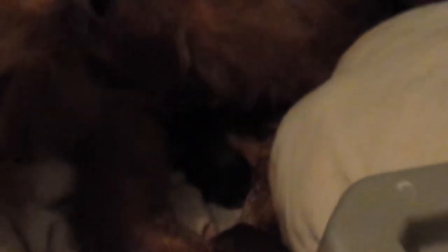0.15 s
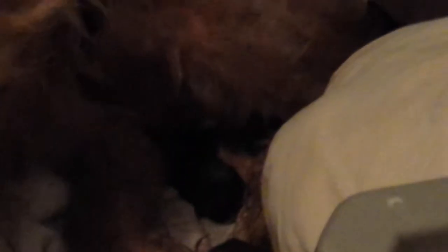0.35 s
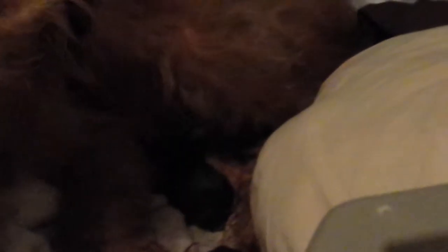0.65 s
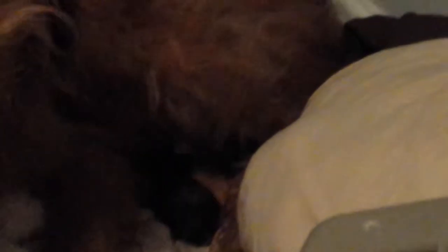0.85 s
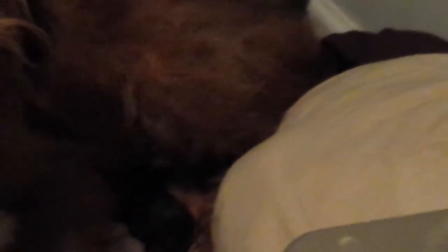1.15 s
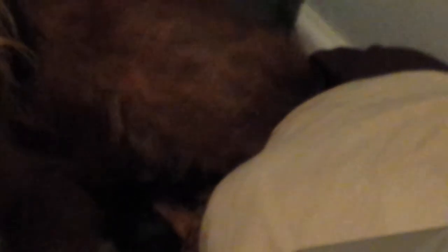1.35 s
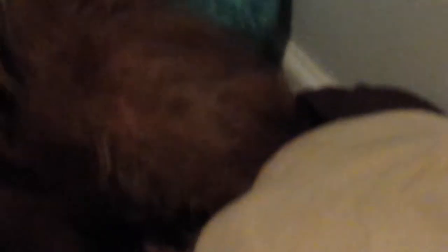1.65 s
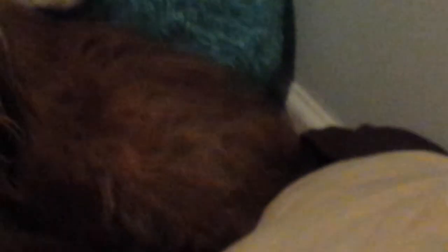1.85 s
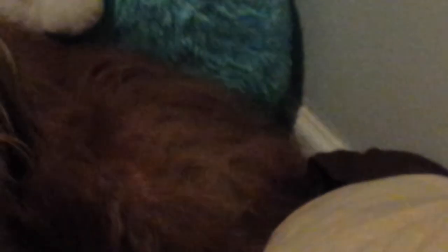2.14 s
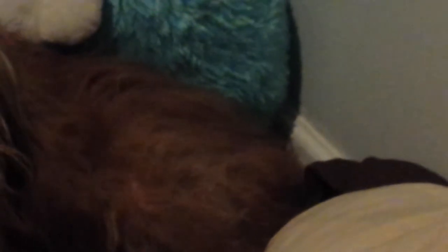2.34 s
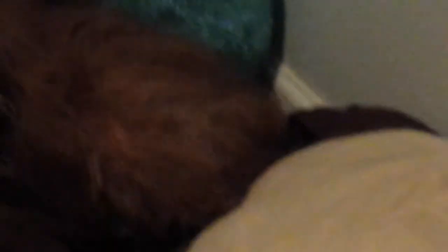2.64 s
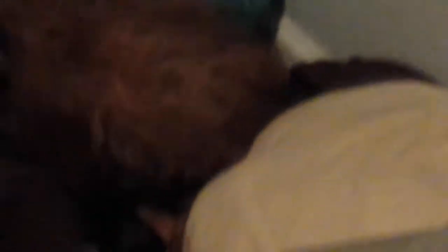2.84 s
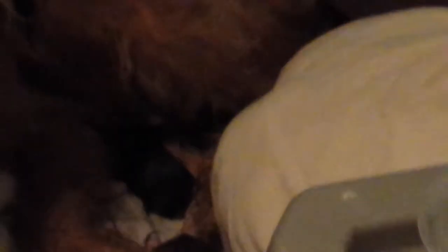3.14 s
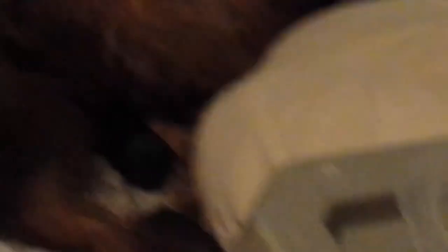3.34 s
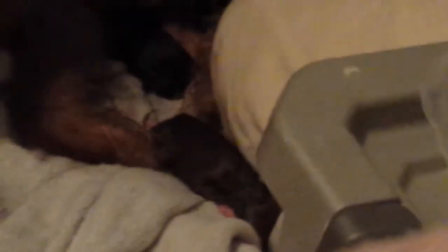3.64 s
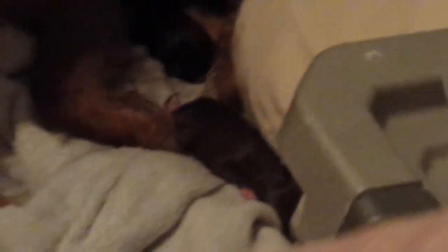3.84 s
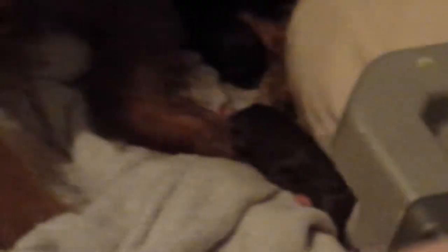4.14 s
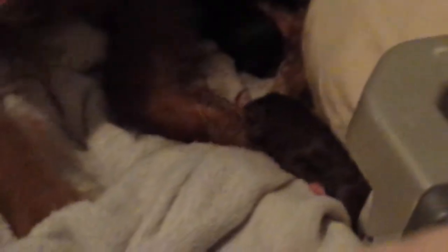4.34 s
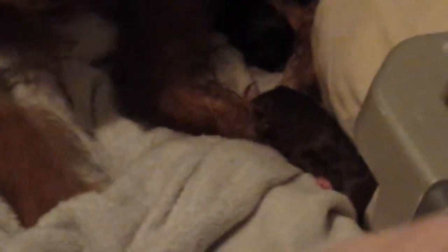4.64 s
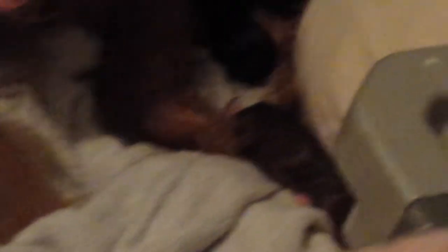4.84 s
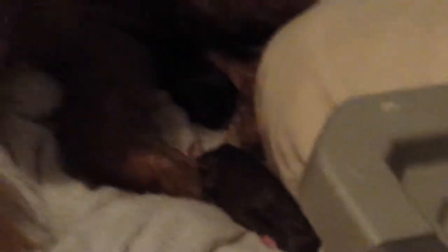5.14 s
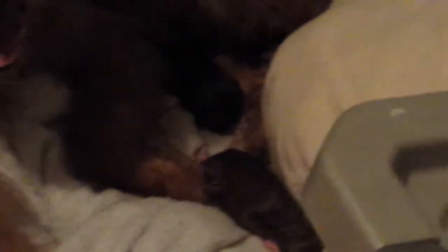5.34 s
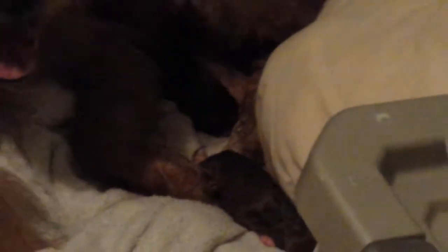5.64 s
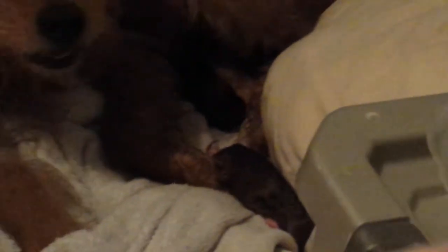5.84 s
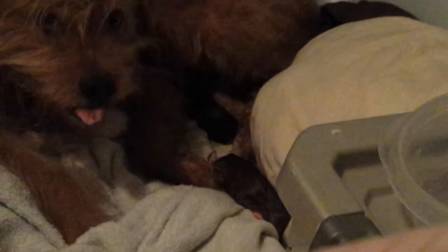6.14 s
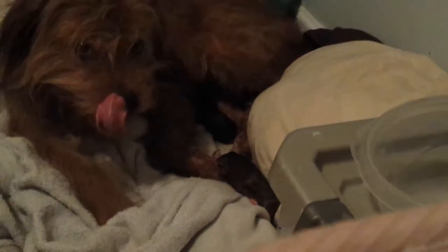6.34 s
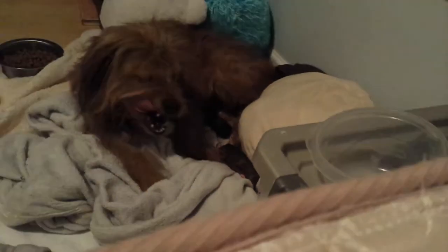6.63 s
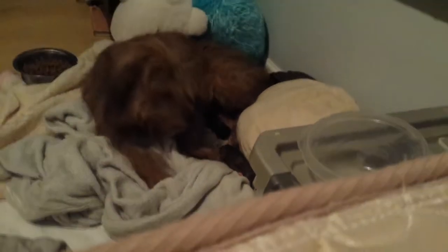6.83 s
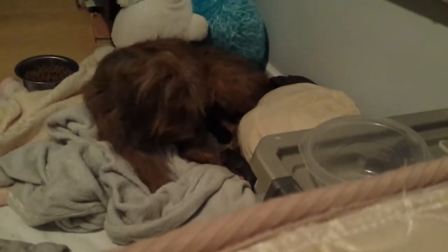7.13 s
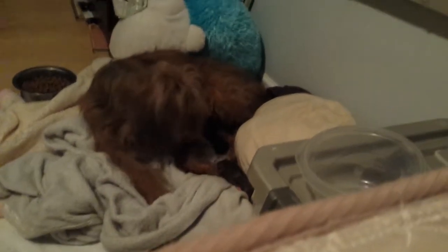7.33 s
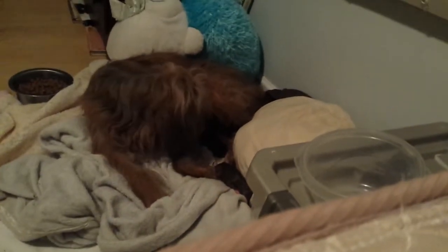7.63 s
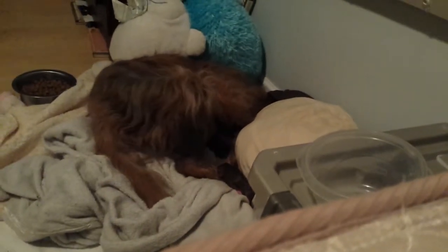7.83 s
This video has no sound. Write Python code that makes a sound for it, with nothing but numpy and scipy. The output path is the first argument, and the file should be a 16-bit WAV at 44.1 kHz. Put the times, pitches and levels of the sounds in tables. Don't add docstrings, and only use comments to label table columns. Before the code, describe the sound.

Tiny puppy voices, thin and trembling, sound close on the left with a short soft tail from bedding. Faint squeaks come first, then yelps, a stronger whimper and a swelling, sinking squeal; afterwards mostly wet tongue ticks and fur rustle. The hand-held microphone picks up dull finger creaks, rubbing, sharp knocks and a pop, over a low steady appliance hum and quiet hiss indoors.

```python
import sys
import numpy as np
from scipy import signal
from scipy.io import wavfile
from scipy.ndimage import uniform_filter1d

SR = 44100
rng = np.random.default_rng(int(sys.argv[2]) if len(sys.argv) > 2 else 0)


def makeup_ratio(level_db):
    decades = np.asarray(level_db, float) / 20
    return 10 ** decades


def dump_mix(stems):
    frames = np.atleast_2d(stems).T
    limited = np.clip(frames, -1, 1)
    pcm = np.round(limited * 32767).astype(np.int16)
    wavfile.write(sys.argv[1], SR, pcm)


N = 351918

# (time [s], pitch [Hz], effort [dB], mouth resonance [Hz], mouth opening [dB])
SQUEAKS = [
    [(.14, 1395, -70, 2700, 13), (.15, 1190, -66, 2500, 22), (.17, 1214, -62, 3000, 30),
     (.183, 1103, -62, 3100, 16), (.2, 1139, -59, 3400, 18), (.222, 1116, -58, 3370, 13),
     (.238, 950, -60, 3600, 20)],
    [(.243, 540, -73, 900, 19), (.26, 510, -73, 650, 24), (.28, 495, -80, 600, 16)],
    [(1.392, 1410, -63.5, 2800, 13), (1.43, 1352, -51, 4050, 7), (1.47, 1335, -56, 3900, 4),
     (1.5, 1207, -63, 2500, -6), (1.53, 1242, -74, 2500, -6)],
    [(2.036, 1250, -62.5, 3960, -14), (2.08, 1411, -74, 1400, 5), (2.11, 1431, -82, 1400, 13),
     (2.135, 1405, -92, 1400, 12)],
    [(4.73, 1410, -78, 4200, 18), (4.8, 1296, -82, 3880, 16)],
    [(5.942, 1238, -57, 2490, 17), (5.965, 1277, -57, 2526, 10.5), (5.984, 1290, -64, 2580, 0),
     (5.992, 1290, -80, 2580, 0)],
]
YELPS = [
    [(2.855, 1303, -66, 3900, -6), (2.878, 1430, -62, 4200, 2), (2.888, 1310, -51.5, 3900, -8),
     (2.908, 1267, -50, 3850, 14), (2.925, 1303, -51.5, 3970, 26.5), (2.945, 1306, -58, 3940, 40)],
    [(2.95, 1523, -60, 4570, 22), (2.965, 1540, -64, 4600, 4), (2.998, 1513, -87, 4540, 15)],
    [(3.852, 1388, -63, 4200, 0), (3.866, 1380, -61, 4200, -2), (3.885, 1245, -49, 3750, 8),
     (3.905, 1080, -50, 4300, 16.5), (3.93, 1066, -56, 4260, 27), (3.955, 1133, -51, 3440, 11),
     (3.982, 1185, -57, 2370, 10)],
    [(3.984, 1480, -60, 2950, 4), (4.01, 1480, -64, 2960, 4), (4.035, 1500, -74, 3000, 4)],
]
WHIMPER = [
    [(4.157, 650, -61, 2580, 7.4), (4.182, 631, -52.5, 2545, 11), (4.196, 741, -43, 2220, 2.9)],
    [(4.206, 808, -42, 2420, 9.5), (4.235, 873, -44, 2614, 8.5), (4.275, 885, -43, 2600, 9),
     (4.297, 886, -47, 2640, 20.5), (4.32, 791, -49, 2370, 11), (4.37, 748, -57.5, 2250, 8),
     (4.39, 866, -58.5, 2600, 18), (4.41, 1010, -60, 2000, 5), (4.433, 1344, -63, 2700, -1)],
]
SQUEAL = [
    [(5.506, 1284, -54, 2500, 4.6), (5.532, 1139, -45.5, 3380, 11.4), (5.582, 1240, -43.5, 3730, 29.3),
     (5.605, 1123, -47, 3360, 31.4), (5.625, 1060, -47.5, 3170, 16), (5.645, 882, -51, 2660, 31),
     (5.665, 795, -48, 2600, 15)],
    [(5.666, 789, -52, 2600, 14.5), (5.688, 825, -46, 2490, 23), (5.715, 889, -44.5, 2730, 22.5),
     (5.74, 975, -41.5, 2950, 16), (5.762, 980, -40, 2950, 18.5), (5.79, 969, -41, 2980, 15.4),
     (5.815, 875, -42.5, 2690, 21), (5.845, 780, -47.5, 2380, 14), (5.865, 638, -51, 2620, 15)],
    [(5.866, 638, -50, 2550, 15), (5.88, 597, -53, 2372, 12), (5.915, 611.5, -53, 2450, 12),
     (5.928, 640, -55, 2560, 12), (5.94, 740, -58, 2900, 8)],
]
# (frequency [Hz], level [dB])
SHUT_MOUTH = [(620, -10), (850, -2.5), (1250, 0), (1800, 1), (2500, -3), (3500, -11), (4300, -11.5),
              (5300, -20)]
# (frequency [Hz], level [dB])
UPPER_PARTIALS = [(2500, -49), (3200, -58), (3700, -58), (4300, -56), (5600, -62), (6500, -68), (7300, -90)]
# (time [s], level [dB])
TIGHTNESS = [(.15, -14), (.185, 4), (.22, 3), (.235, -12), (.25, -25), (1.3, 0), (2.9, 4), (3.885, -16),
             (3.91, 2), (3.98, 2), (4.18, -4), (4.23, 2), (4.3, 2), (4.37, -2), (4.42, -8), (5.55, -1),
             (5.78, 0), (5.87, 4), (5.94, 0)]
# (time [s], length [s], pulse rate [Hz], throat level [dB], chest level [dB])
CROAKS = [
    (0.138, 0.013, 1000, -51, -69),
    (.225, .07, 520, -64, -62),
    (.296, .075, 560, -65, -62),
    (3.985, .07, 1500, -69, -76),
    (4.37, .09, 898, -57, -66),
    (5.849, .14, 629, -57, -69),
]
# (frequency [Hz], width [Hz], level [dB])
THROAT = [(1296, 650, -9), (2600, 620, -0.5), (3820, 800, -1.5), (5510, 1700, -10.5)]
# (time [s], pitch [Hz], level [dB])
FAR_CRY = [
    (7.94, 2180, -77),
    (7.98, 2070, -64),
]
# (peak time [s], level [dB], rise [s], fall [s])
NOSE_AIR = [
    (6.0, -63.5, .04, .14),
]

# (time [s], peak level [dB], frequency [Hz], left over right [dB])
TICKS = [(0.3491, -31, 4000, 32), (0.6998, -49.5, 4260, -6), (1.4234, -44.5, 3980, 21.0),
         (1.4496, -47, 3900, 23), (1.4844, -47, 3980, 5.5), (3.8372, -58, 2790, 14),
         (3.8375, -53, 4000, 14), (4.1185, -40, 4060, -7), (4.1186, -45, 5600, -7), (4.6573, -47, 4030, 16),
         (4.8165, -36, 4140, -7), (5.2644, -51.5, 3770, 8), (6.0492, -44, 2617, 23),
         (6.0574, -45, 3640, 16), (6.124, -51, 3800, 9), (6.8894, -57, 4830, 7), (7.0035, -50, 2760, 14),
         (7.3716, -51.5, 3420, 13), (7.5163, -44, 3550, 21), (7.5657, -53, 3600, 11),
         (7.635, -42.5, 3830, 22)]
TAPS = [(2.606, -51, 1000, -2.5), (2.735, -52, 700, -2), (3.986, -52, 2310, 12.0), (4.018, -52, 800, 0),
        (5.306, -51, 1080, -8), (6.205, -54, 1562, -1), (6.994, -50, 1460, 0), (4.1188, -52, 1600, -7),
        (4.8168, -52, 900, -7), (4.658, -55, 1400, 5), (4.152, -50, 3200, 16)]
CREAKS = [(1.021, -46.5, 238, -14), (1.373, -44, 252, -16), (1.745, -52, 320, -4), (1.762, -52.5, 400, -5),
          (2.013, -50.5, 230, -10), (2.58, -53, 420, -1), (2.593, -48, 222, -14), (2.662, -51, 400, -3),
          (2.676, -46, 330, -3.0), (2.734, -47, 330, -6), (2.795, -48, 370, -4.0), (2.807, -50, 400, -4),
          (2.935, -51, 368.5, -7), (3.02, -50, 365, -6), (3.07, -47, 200, -6), (3.114, -40, 240, -11),
          (3.176, -50, 240, -5), (3.258, -49, 230, 0), (3.374, -51, 210, 1), (3.4, -46, 238, 4),
          (3.413, -48, 266, 3), (3.455, -44, 213, -4), (3.625, -52, 223, -3), (3.844, -47, 290, -12),
          (3.879, -45, 280, -9), (4.018, -43, 340, -9), (4.053, -48, 340, -10), (4.085, -44, 270, -12),
          (4.102, -48, 300, -12), (4.119, -50, 300, -12), (4.139, -49, 326.6, -14),
          (4.179, -43.5, 290, -10),
          (4.639, -47, 270, -12),
    (5.322, -43.5, 250, -8),
    (5.369, -48, 213, -11),
    (5.385, -42.5, 330, -11),
]
# (time [s], peak level [dB], frequency [Hz], swell [s], 60 dB decay [s])
KNOCKS_LEFT = [
    (4.2569, -5.5, 1260, 0.0018, 0.0033),
    (4.2565, -16, 4600, .0006, .002),
    (4.9851, -28, 610, .004, 0.0047),
    (4.985, -30.5, 3900, .00148, 0.0031),
    (6.8744, -22.5, 7780, .001, 0.0016),
    (6.875, -21, 1050, .0029, 0.0056),
    (6.8745, -21, 6100, .0024, 0.0018),
]
KNOCKS_RIGHT = [
    (4.2567, -7.5, 473, 0.00104, 0.0093),
    (4.2565, -21, 2600, .001, .002),
    (4.9852, -17, 484, 0.0035, 0.0042),
    (4.9847, -27.5, 5300, .001, 0.0011),
    (4.9848, -32, 2100, 0.0008, 0.00094),
    (6.8745, -19.5, 2160, .001, 0.0017),
    (6.875, -13.5, 654, 0.0039, 0.0053),
    (6.8743, -15.5, 5400, 0.0011, .00068),
    (6.8744, -23, 13000, 0.0004, .0006),
]
# (time [s], level [dB], recovery [Hz], damping [0-1])
POP = [
    (6.0957, -8.0, 95.0, .62),
]
# (peak time [s], level [dB], rise [s], fall [s])
SLIDE = [
    (2.82, -57, 0.027, 0.07),
    (2.95, -53, .04, .15),
    (3.06, -59, .05, .05),
    (3.12, -51, 0.064, 0.059),
]

# (peak time [s], level [dB], rise [s], fall [s])
RUSTLE = [(.245, -64, .03, .1), (.335, -60.5, 0.12, 0.1), (1.55, -76.5, 0.29, 0.2),
          (3.12, -69.5, 0.48, 0.14), (3.45, -71, 0.24, 0.23), (4.45, -79, 0.64, .15), (5.9, -76, 0.92, .1),
          (6.05, -64, 0.17, 0.23), (6.76, -68, .3, .25), (7.55, -66.5, .3, 0.29)]
HANDLING = [
    (.29, -71, .3, 1.0),
    (2.89, -61.5, 0.39, 0.97),
    (4.16, -60.5, 0.25, 0.47),
    (5.96, -65.5, 1.0, 0.29),
]

# (frequency [Hz], level per Hz [dB])
HISS = [(410, -32), (700, -4.5), (1200, -4.5), (1690, -2.5), (2560, -6.5), (3540, -6), (5640, -6.5),
        (15500, -9.5)]
RUMBLE = [(20, -12.5), (40, -12), (70, 2.5), (110, -1), (160, -7.5), (230, -11), (400, -23), (1000, -33)]
# (frequency [Hz], likeness [-1 to 1])
LIKENESS = [(60, 0.78), (180, 0.91), (550, -0.33), (1650, 0.14), (4970, 0.052), (15000, -0.27)]

MOUTH_BELOW_HZ, MOUTH_ABOVE_HZ, VOICE_FADE_S = 430, 700, .012
NOSE_HZ, NOSE_WIDTH_HZ, NOSE_DB = 3450, 350, -18
HOARSE_UNTIL_S, HOARSE_FACTOR = .3, 2.4
UPPER_GROWTH, UPPER_FULL_DB = .7, -46
UPPER_LOSS_DB = -4.5
BREATH_DB = -27.5
CROAK_RISE, CROAK_FALL = .15, .34
NEST_T60_S, NEST_DB, NEST_RIGHT_DB = .35, -11, -14
SHADOW_HZ, SHADOW_DB, SHADOW_LAG_S = 1200, -4, .0002
SLIPS_PER_S, BRUSH_UNDER_DB = 72.0, -8.5
BOUT_SWING_DB, GRIP_REST_DB, FUR_REST_DB = 13, -73, -80.5
SWELL_DB, SWELL_FROM_DB, SWELL_KNEE_DB, SWELL_HOLD_S = 6, -66, 23, .052
HUM_FOLLOW = .82
HUM_HZ, HUM_DB, RUMBLE_DB = 119.7, -56.0, -59
HISS_DB, HISS_TOP_HZ, CUTOFF_HZ = -76, 15800, 16900


def rms_one(x):
    return x / np.sqrt(np.mean(x ** 2) + 1e-20)


def in_time(rows):
    s, *columns = np.transpose(rows)
    return [np.interp(np.arange(N) / SR, s, c) for c in columns]


def at_hz(points, hz):
    points = np.array(points)
    return np.interp(np.log(hz), np.log(points[:, 0]), points[:, 1])


def band_pass(x, low_hz, high_hz):
    return signal.sosfilt(signal.butter(2, [low_hz, high_hz], "band", fs=SR, output="sos"), x)


def drift(rate_hz):
    r = np.exp(-64 * np.pi * rate_hz / SR)
    slow = signal.lfilter([1], [1, -2 * r, r * r], rng.standard_normal(N // 32 + 2002))[2000:]
    return np.interp(np.arange(N) / 32, np.arange(len(slow)), rms_one(slow))


def bouts(rows, rest_db):
    t = np.arange(N) / SR
    power = makeup_ratio(rest_db) ** 2
    for s, level_db, rise, fall in rows:
        away = np.where(t < s, (s - t) / rise, (t - s) / fall)
        power = power + makeup_ratio(level_db - BOUT_SWING_DB * away) ** 2
    return 10 * np.log10(power)


def sounding(tables, fade_s):
    t = np.arange(N) / SR
    on = sum((t >= rows[0][0]) * (t < rows[-1][0]) * 1. for rows in tables)
    return uniform_filter1d(np.minimum(on, 1), int(fade_s * SR))


def throat(x):
    out = 0
    for k, (hz, width, level_db) in enumerate(THROAT):
        r = np.exp(-np.pi * width / SR)
        poles = [2, -4 * r * np.cos(2 * np.pi * hz / SR), 2 * r * r]
        peak = signal.lfilter([1 - r * r, 0, r * r - 1], poles, x)
        out = out + (-1) ** k * makeup_ratio(level_db) * peak
    return out


def cries():
    syllables = sorted(SQUEAKS + YELPS + WHIMPER + SQUEAL)
    pitch, effort_db, mouth_hz, open_db = in_time([row for rows in syllables for row in rows])
    tremble = np.where(np.arange(N) < HOARSE_UNTIL_S * SR, HOARSE_FACTOR, 1)
    pitch = uniform_filter1d(pitch, int(.0045 * SR)) * (1 + .005 * tremble * drift(60.36))
    phase = 2 * np.pi * np.cumsum(pitch) / SR
    nose_db = NOSE_DB * sounding(WHIMPER, VOICE_FADE_S)

    gains = []
    for hz in pitch * np.arange(1, 5)[:, None]:
        skirt = (hz - mouth_hz) / np.where(hz < mouth_hz, MOUTH_BELOW_HZ, MOUTH_ABOVE_HZ)
        mouth_db = open_db / (1 + skirt ** 2)
        dip_db = nose_db / (1 + ((hz - NOSE_HZ) / NOSE_WIDTH_HZ) ** 2)
        gains.append(makeup_ratio(effort_db + at_hz(SHUT_MOUTH, hz) + mouth_db + dip_db))
    effort = np.sqrt(sum(g ** 2 for g in gains))
    lift = np.minimum(effort / makeup_ratio(UPPER_FULL_DB), 1) ** UPPER_GROWTH * makeup_ratio(in_time(TIGHTNESS)[0])
    for k in range(4):
        gains.append(lift * makeup_ratio(at_hz(UPPER_PARTIALS, (k + 5) * pitch) + k * UPPER_LOSS_DB))

    tone = 0
    for k, gain in enumerate(gains):
        flicker = makeup_ratio((1.5 + .5 * k) * tremble * drift(50))
        tone = tone + gain * flicker * np.sin((k + 1) * phase + k * k)
    puffs = rms_one(throat(rng.standard_normal(N) * (1 + np.cos(phase))))
    breath = effort * makeup_ratio(BREATH_DB) * tremble * puffs
    return (np.sqrt(2) * tone + breath) * sounding(syllables, VOICE_FADE_S)


def croaks():
    held = [(s + end * length, *rest) for s, length, *rest in CROAKS for end in (0, 1)]
    rate, throat_db, chest_db = in_time(held)
    effort = 0
    for s, length, *_ in CROAKS:
        along = (np.arange(N) / SR - s) / length
        effort = effort + np.clip(np.minimum(along / CROAK_RISE, (1 - along) / CROAK_FALL), 0, 1)
    cycle = np.cumsum(rate * (1 + .09 * drift(120))) / SR
    pulses = np.diff(np.floor(cycle), prepend=0) * makeup_ratio(4.13 * rng.standard_normal(N))
    raw = rms_one(pulses - pulses.mean()) + .5 * rng.standard_normal(N)
    voice = makeup_ratio(throat_db) * rms_one(throat(throat(raw)))
    voice = voice + makeup_ratio(chest_db) * rms_one(band_pass(raw, 430, 1150))
    return voice * makeup_ratio(3.4 * drift(43)) * effort


def far_cry():
    hz, level_db = in_time(FAR_CRY)
    phase = 2 * np.pi * np.cumsum(hz) / SR
    started = np.arange(N) > FAR_CRY[0][0] * SR
    return makeup_ratio(level_db) * (np.sin(phase) + .15 * np.sin(3 * phase)) * started


def nest(x):
    t = np.arange(int(.35 * SR)) / SR
    tails = rng.standard_normal((2, len(t))) * makeup_ratio(-60 * t / NEST_T60_S) * (t > .003)
    tails /= np.sqrt(np.sum(tails ** 2, axis=1, keepdims=True))
    wet = signal.fftconvolve(x[None], tails, axes=1)[:, :N] * makeup_ratio(np.array([[NEST_DB], [NEST_RIGHT_DB]]))
    late = np.roll(x, int(SHADOW_LAG_S * SR)) + wet[1]
    shaded = signal.lfilter(*signal.butter(3, SHADOW_HZ, fs=SR), late)
    return np.array([2.01 * x + 2 * wet[0], makeup_ratio(SHADOW_DB) * shaded])


def add(out, s, burst, pan_db):
    i = int(s * SR)
    sides = makeup_ratio(np.array([pan_db, -pan_db]) / 2)
    out[:, i:i + len(burst)] += np.outer(sides / sides.mean(), burst)[:, :N - i]


def small_contacts(table, cycles, rise_cycles, spray):
    out = np.zeros((2, N))
    noise = rng.standard_normal((len(table), 900))
    for (s, peak_db, hz, pan_db), grit in zip(table, noise):
        t = np.arange(900) * hz / SR
        shape = (1 - np.exp(-t / rise_cycles)) ** 2 * makeup_ratio(-60 * t / cycles)
        grit = signal.lfilter(*signal.butter(1, [hz, 1.48 * hz], "band", fs=SR), grit)
        burst = shape * (np.sin(2 * np.pi * t) + spray * rms_one(grit))
        add(out, s, makeup_ratio(peak_db) * burst / np.abs(burst).max(), pan_db)
    return out


def knocks():
    out = np.zeros((2, N))
    before = 300
    t = np.arange(-before, 900) / SR
    for side, table in enumerate([KNOCKS_LEFT, KNOCKS_RIGHT]):
        for s, peak_db, hz, swell, t60 in table:
            shape = makeup_ratio(-60 * np.where(t < 0, -t / swell, t / t60))
            shape = uniform_filter1d(shape, int(.25 * SR / hz) + 1)
            shape /= shape.max()
            i = int(s * SR) - before
            out[side, i:i + len(t)] += makeup_ratio(peak_db) * shape * np.cos(2 * np.pi * hz * t)
    for s, step_db, hz, damping in POP:
        vent = signal.bilinear([1, 0, 0], [1, 4 * np.pi * damping * hz, (2 * np.pi * hz) ** 2], SR)
        step = uniform_filter1d(makeup_ratio(step_db) * (np.arange(N) >= s * SR), size=2)
        out[0] += signal.lfilter(*vent, step)
    return out


def ring(x, hz, t60):
    r, w = makeup_ratio(-60 / (t60 * SR)), 2 * np.pi * hz / SR
    return signal.lfilter([0, np.sin(w)], [1, -2 * r * np.cos(w), r * r], x + 1e-18)


def rubbing(level_db, low_hz, high_hz, per_s, pan_db):
    struck = rng.random((2, N)) < per_s / SR
    grains = struck * rng.standard_normal((2, N)) * makeup_ratio(2.4 * drift(25))
    band = band_pass(grains, low_hz, high_hz)
    return makeup_ratio(level_db) * rms_one(band) * makeup_ratio(np.array([[pan_db], [-pan_db]]))


def slide():
    slip_db = bouts(SLIDE, -120)
    beat = np.cumsum(SLIPS_PER_S * (1 + .3 * drift(20))) / SR
    slips = np.diff(np.floor(beat), prepend=0) * makeup_ratio(2.8 * rng.standard_normal(N))
    thuds = rms_one(ring(slips, 330, .009) + .54 * ring(slips, 550, .0056))
    thuds = thuds * makeup_ratio(np.array([[-5.0], [3.0]]))
    brush = rubbing(slip_db + BRUSH_UNDER_DB - 3.0, 500, 4000, per_s=6000.0, pan_db=.5)
    return makeup_ratio(slip_db - 2.5) * thuds + brush


def rustle():
    fur = rubbing(bouts(RUSTLE, FUR_REST_DB), 3200, 4680, per_s=3000., pan_db=5.0)
    air = rubbing(bouts(NOSE_AIR, -120), 4100, 4500, per_s=9000., pan_db=6.0)
    return fur + air


def grip():
    return rubbing(bouts(HANDLING, GRIP_REST_DB) + .5, 170.8, 590, per_s=350., pan_db=-1.5)


def suppression(x):
    power = uniform_filter1d(np.mean(x ** 2, axis=0), int(SWELL_HOLD_S * SR))
    above_db = 10 * np.log10(np.abs(power) + 1e-12) - SWELL_FROM_DB
    return SWELL_DB * np.tanh(np.maximum(above_db, 0) / SWELL_KNEE_DB)


def banded_noise(spectrum, low_hz, high_hz, count, patchy_db):
    out, edges = 0, np.geomspace(low_hz, high_hz, count + 1)
    white = rng.standard_normal((2, 2, N))
    for k, (low, high) in enumerate(zip(edges, edges[1:])):
        mid, side = band_pass(white[k % 2], low, high)
        hz = np.sqrt(low * high)
        alike = np.clip(at_hz(LIKENESS, hz), -.95, .95)
        gain = makeup_ratio(at_hz(spectrum, hz)) * (1 + patchy_db / 9 * drift(7.9))
        out = out + gain * (np.sqrt(1 + alike) * mid + np.sqrt(1 - alike) * side * [[1], [-1]])
    return rms_one(out)


def room_tone(swell_db):
    phase = 2 * np.pi * np.cumsum(HUM_HZ * (1 + .012 * drift(6))) / SR
    hum = np.array([makeup_ratio(1.5) * np.sin(phase + .29), makeup_ratio(-1.45) * np.sin(phase)]) * np.sqrt(2)
    hum = hum * makeup_ratio(HUM_DB + 1.0 * drift(6.76))
    rumble = makeup_ratio(RUMBLE_DB) * banded_noise(RUMBLE, 22.9, 1000.0, count=8, patchy_db=.9)
    return makeup_ratio(HUM_FOLLOW * swell_db) * (hum + rumble)


def hiss(swell_db):
    noise = makeup_ratio(HISS_DB + 9.0 + swell_db) * banded_noise(HISS, 690.0, 18100.0, count=7, patchy_db=.5)
    return signal.sosfilt(signal.cheby2(16, 50, HISS_TOP_HZ, fs=SR, output="sos"), noise)


def scene():
    near = nest(cries() + croaks() + far_cry()) + slide()
    swell_db = suppression(near)
    ticks = makeup_ratio(1.5) * small_contacts(TICKS, cycles=16.0, rise_cycles=1.7, spray=.3)
    taps = makeup_ratio(2.5) * small_contacts(TAPS, cycles=4.03, rise_cycles=.22, spray=.82)
    creaks = makeup_ratio(2.5) * small_contacts(CREAKS, cycles=2.5, rise_cycles=.29, spray=.18)
    handling = ticks + taps + creaks + knocks() + rustle() + grip()
    return near + handling + room_tone(swell_db - .5) + hiss(swell_db)


def low_pass(x):
    return signal.sosfilt(signal.butter(12, 16650, fs=SR, output="sos"), x)


def record(dry):
    finished = signal.sosfilt(signal.cheby2(12, 60, CUTOFF_HZ, fs=SR, output="sos"), dry)
    return low_pass(finished)


dry = scene()
out = record(dry)
dump_mix(out)
```